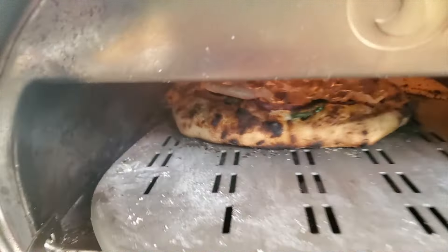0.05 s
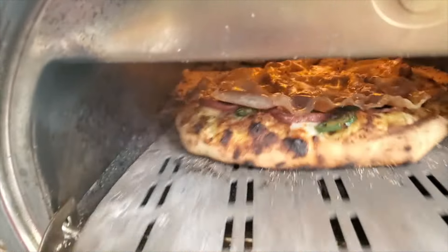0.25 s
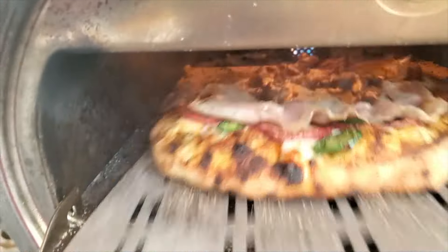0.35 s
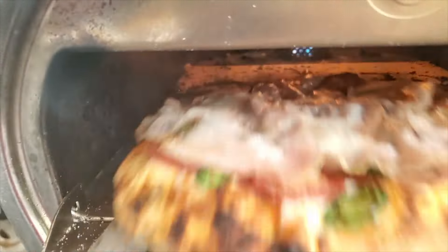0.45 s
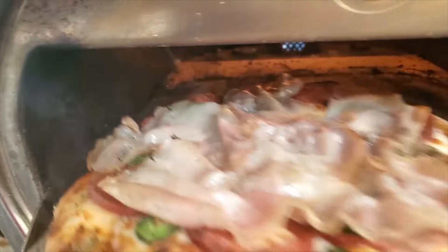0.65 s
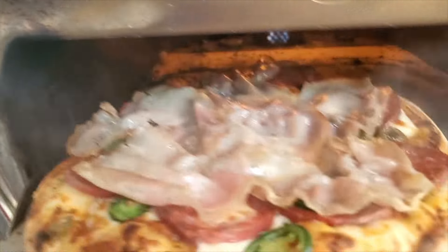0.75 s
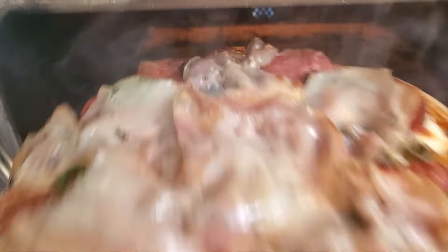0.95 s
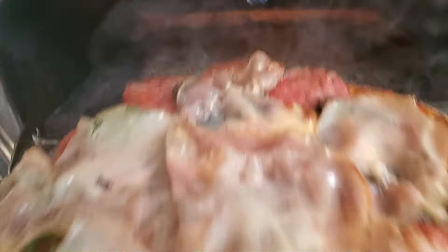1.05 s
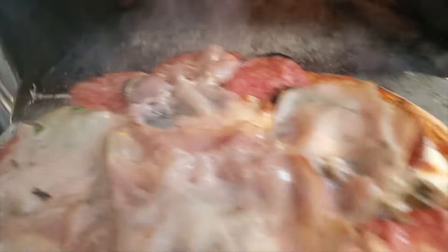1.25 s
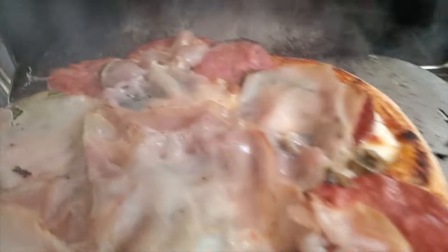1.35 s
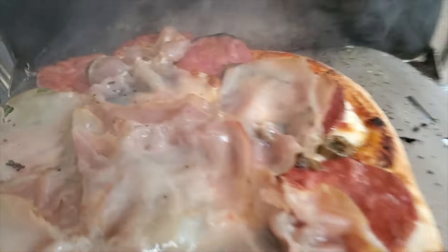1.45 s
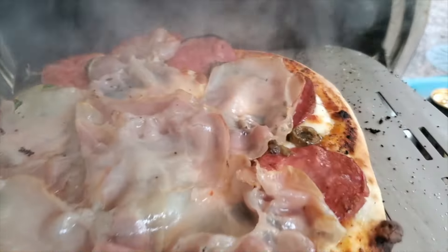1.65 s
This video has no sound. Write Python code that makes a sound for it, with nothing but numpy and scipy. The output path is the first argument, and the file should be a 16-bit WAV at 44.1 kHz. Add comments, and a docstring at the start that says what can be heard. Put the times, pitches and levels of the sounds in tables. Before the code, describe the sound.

A metal peel scrapes close by over the stone floor of a small pizza oven. The first stroke hisses and rasps with a few ringing knocks, and a shorter one follows. A gas burner hums faintly behind.

```python
"""A perforated metal peel scrapes under a pizza and drags it over the gritty stone of a small gas oven.
Stick-slip friction makes it hiss, rasp and grind in two main strokes, with a short ring from the oven.
Rubbing briefly excites single modes of the blade; knocks ring its low bending modes; crumbs catch and tick.
The burner hums faintly behind. The scrape is close to the right microphone."""
import sys
import numpy as np
from scipy import signal
from scipy.fft import rfft, irfft
from scipy.io import wavfile

SR = 44100
rng = np.random.default_rng(int(sys.argv[2]) if len(sys.argv) > 2 else 0)


def unload_wav(signal):
    """Save mono or channel-first audio to the path in sys.argv[1] as 16-bit WAV at rate SR, clipped to [-1, 1]."""
    wavfile.write(
        sys.argv[1],
        SR,
        np.round(np.clip(np.atleast_2d(signal).T, -1, 1) * 32767).astype(np.int16),
    )


N = 74970
T = np.arange(N) / SR
HZ = np.fft.rfftfreq(N, 1 / SR)


def amp(db):
    """Amplitude ratio: tenfold per 20 dB."""
    return 10 ** (np.asarray(db) / 20)


def unit(x):
    """Normalisation to rms 1."""
    return x / np.sqrt(np.mean(x ** 2) + 1e-20)


def spectrum(points):
    """Interpolation of a table over log frequency."""
    hz, value = np.transpose(points)
    return np.interp(np.log(HZ + 1), np.log(hz), value)


def envelope(table, column):
    """Amplitude envelope, interpolated in decibels."""
    rows = np.array(table)
    return amp(np.interp(T, rows[:, 0], rows[:, column]))


def wander(cutoff_hz):
    """Random modulation: low-passed noise of rms 1."""
    return unit(irfft(rfft(rng.standard_normal(N)) / (1 + (HZ / cutoff_hz) ** 4), N))


def strike(start, t60, rise_s=0.00078):
    """Damping: exponential decay with a quick linear onset."""
    age = np.maximum(T - start, 0)
    return np.minimum(age / rise_s, 1) * np.exp(-np.log(1000) * age / t60)


# Level difference between the microphones: frequency_hz, left_minus_right_db
MIC_BALANCE = [(60, 7), (200, -3), (500, -4), (1100, -8), (1800, -5), (2700, -17.5), (4000, -14.5),
               (5300, -12.5), (6500, -27.5), (8000, -32.5), (11000, -23.5), (15000, -27.5)]
# Likeness of the two channels: frequency_hz, correlation
MIC_COHERENCE = [(25, 0.36), (70, 0.57), (200, 0.98), (500, 0.52), (1000, 0.48), (2000, 0.05),
                 (8000, 0.037)]
LEFT_LAG_S = 0.00033

def mic_pair(sources, points, resonance=1):
    """Partial coherence: two signals, filtered and mixed, reach the left side later and mostly weaker."""
    right, independent = rfft(sources) * amp(spectrum(points)) * resonance
    coherence = np.clip(spectrum(MIC_COHERENCE), 0, 1)
    balance = amp(spectrum(MIC_BALANCE))
    delay = np.exp(-2j * np.pi * HZ * LEFT_LAG_S)
    left = (coherence * right + np.sqrt(1 - coherence ** 2) * independent) * balance * delay
    pair = irfft(np.array([left, right]) / (1 + balance), N)
    return pair / pair.mean(0).std()


def noise(points):
    """Spectral shaping of white noise, in stereo."""
    return mic_pair(rng.standard_normal((2, N)), points)


# Swells of the burner hum: time_s, level_db
HUM_ENVELOPE = [(0.0, -61.5), (0.274, -51), (0.478, -54), (0.555, -40.5), (0.672, -55.5), (0.918, -59),
                (1.078, -48), (1.258, -66), (1.33, -54.5), (1.465, -65), (1.52, -53), (1.7, -53)]
# Rush of the flame: frequency_hz, density_db
FLAME_SPECTRUM = [(20, -37), (60, 3.5), (110, -7.5), (180, -8), (350, -12), (600, -9), (1200, -16.5),
                  (2500, -19.5), (6000, -36.5), (8000, -61), (14000, -19)]

def burner(pitch_hz=79.2, waver_hz=2.8, flutter_db=1.8, hum_db=1.5, flame_db=-55.5):
    """Random frequency and amplitude modulation make a low hum waver over broadband flame noise."""
    cycles = np.cumsum(pitch_hz + waver_hz * wander(8.5)) / SR
    tone = unit(np.sin(2 * np.pi * cycles) * amp(flutter_db * wander(22)))
    hum = amp(hum_db) * tone * envelope(HUM_ENVELOPE, 1)
    pan = amp([[-2.5], [-0.6]])
    return hum * pan + amp(flame_db) * noise(FLAME_SPECTRUM)


# Moments when one blade mode sings: peak_s, length_s, pitch_hz, level_db
FRICTION_TONES = [(0.16, 0.18, 200.6, -49.5), (0.351, 0.073, 383.7, -38), (0.364, 0.033, 3225, -34),
                  (0.423, 0.11, 181.6, -41.5), (0.424, 0.058, 6520, -29), (0.46, 0.051, 5480, -30),
                  (0.468, 0.046, 3680, -32), (0.584, 0.1, 4100, -34), (0.693, 0.041, 194.5, -37),
                  (0.914, 0.12, 2374, -49.5), (0.933, 0.045, 916, -40.5), (0.937, 0.045, 1230, -42.5),
                  (0.938, 0.05, 5660, -42.5), (1.022, 0.036, 4130, -33), (1.037, 0.072, 3290, -36.5),
                  (1.035, 0.02, 5220, -31.5), (1.035, 0.022, 5680, -33.5), (1.048, 0.064, 160, -41.5),
                  (1.096, 0.18, 484, -38), (1.157, 0.088, 695, -40.5)]

def friction_tones(waver_hz=13.7, roughness=0.67, left_db=-3):
    """Frictional excitation briefly feeds single modes of the steel: rough, unsteady tones."""
    out = np.zeros((2, N))
    for peak, length, hz, db in FRICTION_TONES:
        swell = np.cos(np.pi * np.clip((T - peak) / length, -.5, .5))
        cycles = np.cumsum(hz + waver_hz * wander(62)) / SR - hz * np.array([[LEFT_LAG_S], [0]])
        flutter = 1 + roughness * wander(96)
        balance = amp(np.interp(hz, HZ, spectrum(MIC_BALANCE)) + left_db)
        pan = 2 * np.array([[balance], [1]]) / (1 + balance)
        out += amp(db) * swell * flutter * np.sin(2 * np.pi * cycles) * pan
    return out


# Blade striking stone: start_s, ring_db, pitch_hz, t60_s, clack_db
BLADE_KNOCKS = [(0.2346, -17, 208.3, 0.24, -31), (0.273, -22, 217.5, 0.11, -50),
                (0.328, -24.5, 196, 0.13, -42), (0.593, -33, 161, 0.058, -28.5),
                (0.605, -20, 188.8, 0.18, -31), (0.665, -30, 188.8, 0.2, -33.5),
                (1.008, -28, 320, 0.057, -35.5), (1.271, -38, 195, 0.12, -67)]
# Bending modes of the blade: pitch_ratio, gain_db, t60_ratio
BENDING_MODES = [(.47, -21, 1.1), (1, 1, 0.91), (1.85, -20.5, 0.89), (2.88, -14.5, 0.39), (3.4, -21, 0.35),
                 (4.3, -24.5, 0.9)]
# Contact noise of a knock: frequency_hz, density_db
CLACK_SPECTRUM = [(60, -9), (200, 1), (750, 2), (1200, -7), (3000, -8.5), (7000, -35), (16000, -24)]

def knocks(rise_s=0.007, clack_t60_s=0.061):
    """Impact excites a clack and damped bending modes, whose pitch differs with each knock's load."""
    clack, out = noise(CLACK_SPECTRUM), np.zeros((2, N))
    pan = amp([[-3], [2]])
    for start, db, hz, t60, clack_db in BLADE_KNOCKS:
        age = T - start - np.array([[LEFT_LAG_S], [0]])
        for ratio, mode_db, t60_ratio in BENDING_MODES:
            decay = strike(start, t60 * t60_ratio, rise_s)
            out += amp(db + mode_db) * decay * np.sin(2 * np.pi * hz * ratio * age) * pan
        out += amp(clack_db - 1) * strike(start, clack_t60_s) * clack
    return out


# Fine friction noise, here and in the scrape: frequency_hz, density_db
HISS_SPECTRUM = [(3000, -23), (5500, -5.5), (7600, -13.5), (9500, -9.5), (11500, -4), (13200, 0.5),
                 (14500, 3.5), (16000, -7)]
# Coarse friction noise, likewise: frequency_hz, density_db
RASP_SPECTRUM = [(600, -21.5), (1200, -7.5), (1800, 0.5), (2400, -1), (3200, 1.5), (4500, -1), (6500, -5),
                 (7600, -13), (11000, -8.5)]
# Crumbs and edges catching: start_s, level_db, t60_s, hiss_power_share
CRUMB_CATCHES = [(0.354, -18, 0.037, 0.74), (0.419, -19.5, 0.055, 0.53), (0.445, -15, 0.035, 1),
                 (0.475, -22.5, 0.026, 0.5), (0.491, -17, 0.019, 0.98), (0.544, -25, .04, 0),
                 (0.592, -18, 0.044, 0.45), (0.603, -18.5, 0.036, 0.47), (0.859, -31, 0.024, 0.87),
                 (0.927, -31.5, 0.038, 0.76), (1.014, -26, 0.046, 0.8), (1.03, -21.5, 0.025, 0.24),
                 (1.046, -21, 0.028, 1), (1.134, -23, 0.025, 1), (1.254, -36.5, 0.048, 0.34),
                 (1.273, -34.5, 0.037, 0.96), (1.407, -52, .04, 0.95)]

def catches():
    """Contact transients: a crumb or an edge catches and releases a decaying burst of noise."""
    hiss, rasp, out = noise(HISS_SPECTRUM), noise(RASP_SPECTRUM), np.zeros((2, N))
    for start, db, t60, share in CRUMB_CATCHES:
        blend = np.sqrt(share) * hiss + np.sqrt(1 - share) * rasp
        out += amp(db) * strike(start, t60) * blend
    return out


def oven(direct, positions=8, t60_s=0.071, reflections_db=-5.5):
    """Cavity reverberation: short, dense reflections that change as the contact point travels."""
    wet = np.zeros((2, N))
    for k in range(positions):
        crossfade = np.sqrt(np.maximum(1 - abs(T / T[-1] * (positions - 1) - k), 0))
        tail = (rng.standard_normal((2, N)) * strike(0.0014, t60_s))[:, :SR // 10]
        wet += signal.oaconvolve(direct * crossfade, tail / np.linalg.norm(tail[0]), axes=1)[:, :N]
    return direct + amp(reflections_db) * wet


# Course of the two strokes: time_s, hiss_db, rasp_db, grind_db
STROKE_ENVELOPES = [(0.0, -46.5, -52.5, -57), (0.074, -39.5, -43.5, -52), (0.165, -38.5, -42, -54.5),
                    (0.232, -47.5, -55, -58.5), (0.24, -36, -41, -43), (0.274, -39.5, -43, -48),
                    (0.306, -30, -35, -48.5), (0.34, -29, -32.5, -43), (0.354, -27.5, -30.5, -50),
                    (0.44, -16.5, -26.5, -43), (0.458, -19.5, -29.5, -56), (0.516, -23, -30, -51),
                    (0.538, -33, -33, -48), (0.554, -29.5, -33.5, -35.5), (0.582, -25, -28.5, -39.5),
                    (0.6, -30.5, -34.5, -31), (0.624, -30.5, -33.5, -37.5), (0.644, -31.5, -31.5, -41.5),
                    (0.666, -24.5, -30.5, -34.5), (0.7, -32.5, -31, -40.5), (0.756, -46.5, -49, -54.5),
                    (0.912, -44, -46.5, -49.5), (0.934, -43, -39, -50.5), (0.984, -47, -49, -49),
                    (1.005, -41, -41, -48), (1.032, -27, -36, -44.5), (1.056, -33, -32, -49),
                    (1.07, -34.5, -37, -38.5), (1.144, -27.5, -31, -37), (1.188, -31, -34, -37),
                    (1.22, -53.5, -49.5, -54.5), (1.245, -50.5, -52, -54.5), (1.292, -44, -42.5, -48),
                    (1.33, -54.5, -62, -61), (1.7, -61, -67.5, -72)]
# Low grinding on the stone: frequency_hz, density_db
GRIND_SPECTRUM = [(40, -13.5), (100, -0.5), (140, -7.5), (200, -2), (270, -4.5), (500, -0.5), (780, -1.5),
                  (1000, -8), (1300, -3), (2200, -4.5), (5000, -83)]
# Resonances of the rubbed blade: centre_hz, bandwidth_hz, gain_db
BLADE_RESONANCES = [(185, 57, 1), (470, 23, -9), (726, 26, -10.5), (824, 67, -1), (1210, 45, -2.5),
                    (2362, 24, -5), (3314, 24, -4), (4120, 23, -4)]

def scrape(grains_per_s=9000, spread_db=3, chatter_db=0.5, judder_db=0.75, flutter_db=1.22):
    """Stick-slip friction breaks grit in clumps; each grain's impulse excites blade and oven."""
    slip_db = chatter_db * wander(417) + judder_db * wander(62)  # common to all three layers
    blade = 1 + sum(amp(db) / (1 + 2j * (HZ - hz) / width) for hz, width, db in BLADE_RESONANCES)
    layers = [(HISS_SPECTRUM, 1), (RASP_SPECTRUM, -0.5), (GRIND_SPECTRUM, 1.5)]
    out = np.zeros((2, N))
    for column, (points, gain_db) in enumerate(layers, start=1):
        grain_db = spread_db * np.minimum(rng.exponential(1, (2, N)), 4)
        size = amp(grain_db + slip_db + flutter_db * wander(69.5))
        polarity = rng.choice([-1, 1], (2, N))
        breaks = rng.random((2, N)) < grains_per_s / SR
        friction = mic_pair(oven(size * polarity * breaks), points, blade)
        out += amp(gain_db) * envelope(STROKE_ENVELOPES, column) * friction
    return out


def scene():
    """Superposition of the peel's sounds and the burner."""
    return scrape() + friction_tones() + catches() + knocks() + burner()


def record(dry, ceiling=0.88, cutoff_hz=15850):
    """Soft saturation rounds the highest peaks; a low-pass filter limits the band."""
    rounded = dry / (1 + (dry / ceiling) ** 6) ** (1 / 6)
    lowpass = signal.firwin(511, cutoff_hz, window=("kaiser", 9), fs=SR)
    return signal.oaconvolve(rounded, lowpass[None], "same")


dry = scene()
out = record(dry)
unload_wav(out)
```